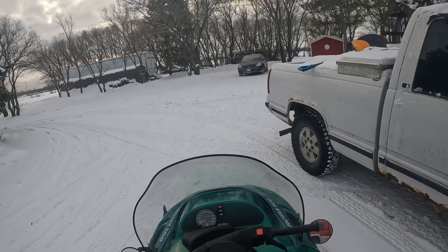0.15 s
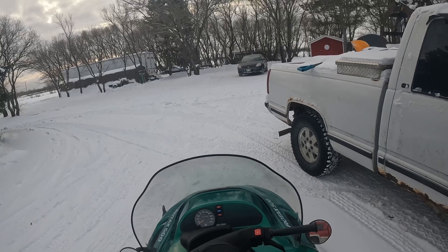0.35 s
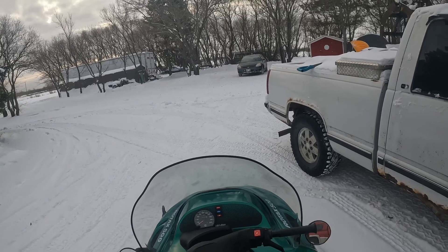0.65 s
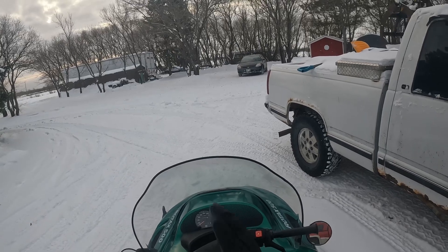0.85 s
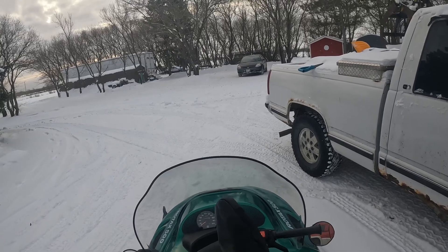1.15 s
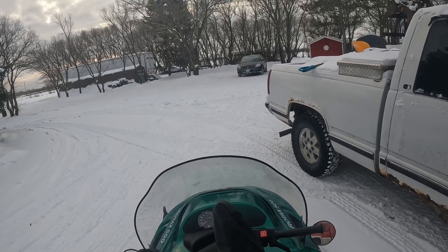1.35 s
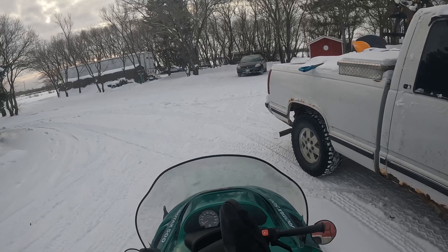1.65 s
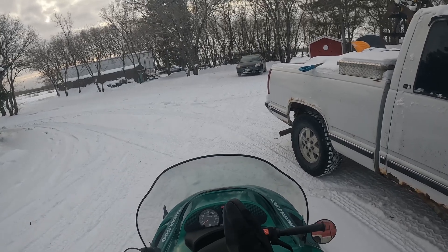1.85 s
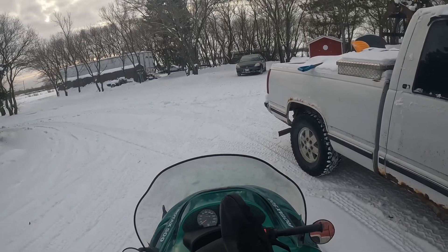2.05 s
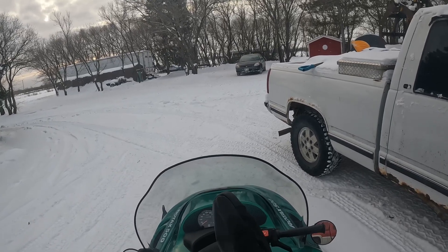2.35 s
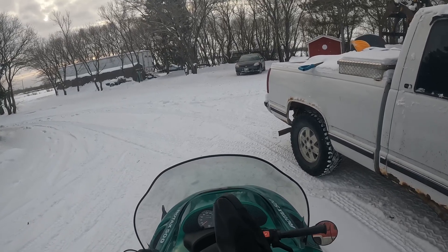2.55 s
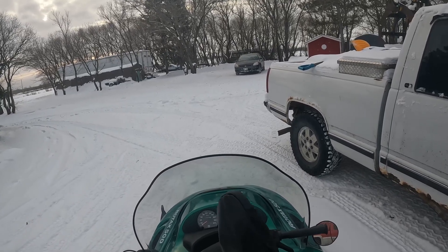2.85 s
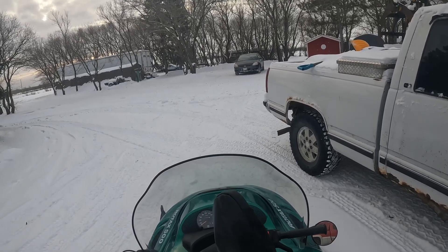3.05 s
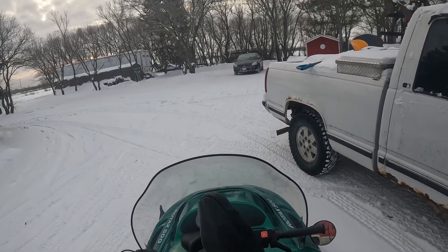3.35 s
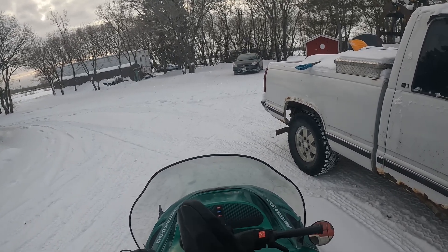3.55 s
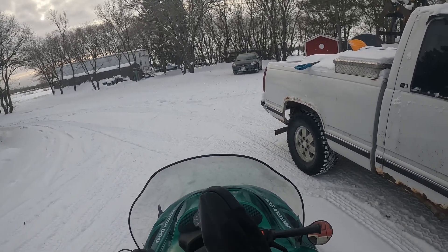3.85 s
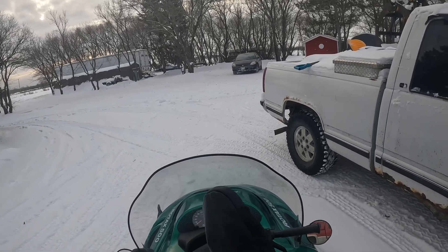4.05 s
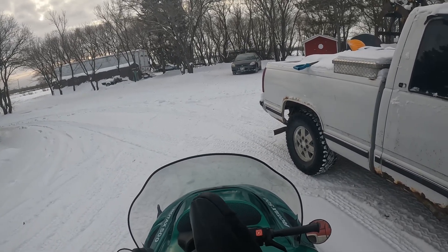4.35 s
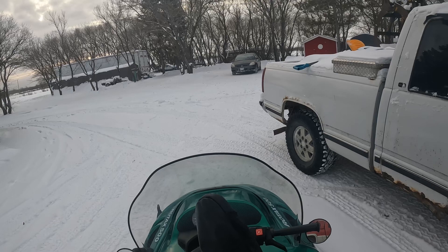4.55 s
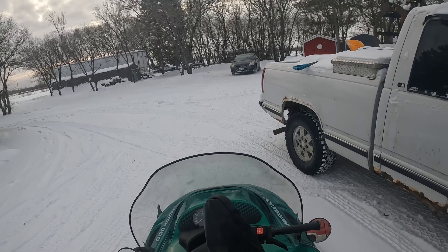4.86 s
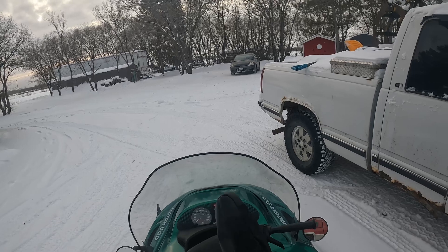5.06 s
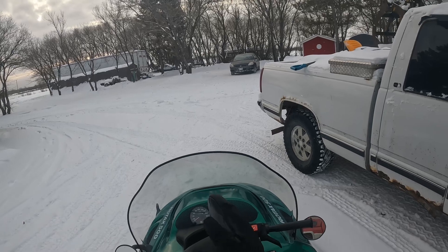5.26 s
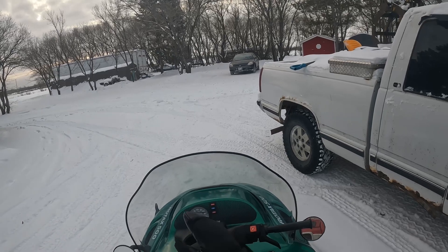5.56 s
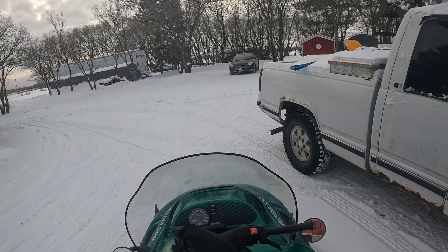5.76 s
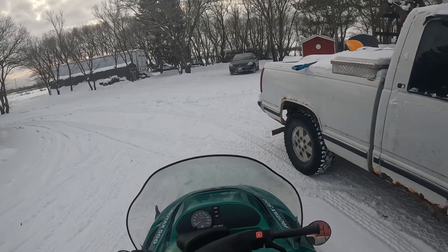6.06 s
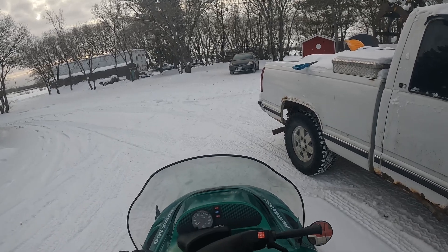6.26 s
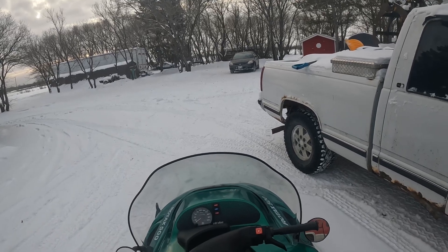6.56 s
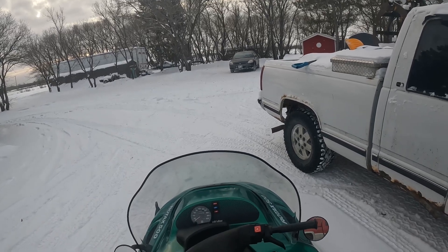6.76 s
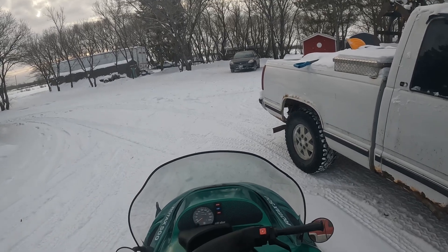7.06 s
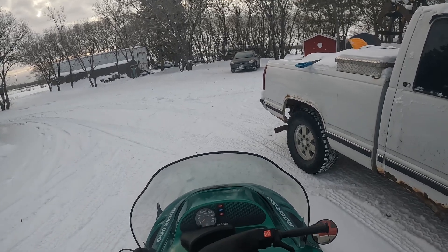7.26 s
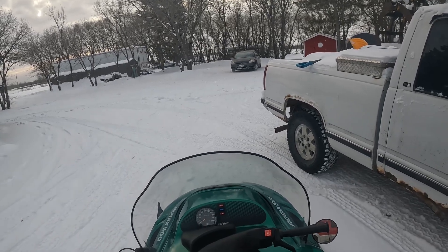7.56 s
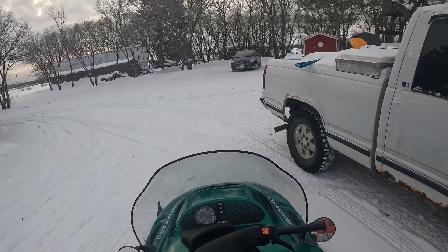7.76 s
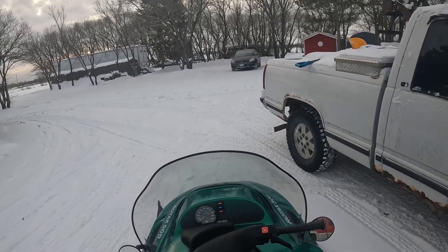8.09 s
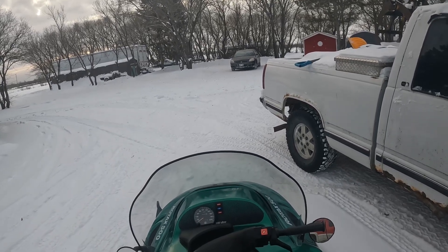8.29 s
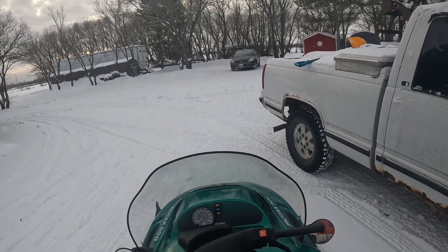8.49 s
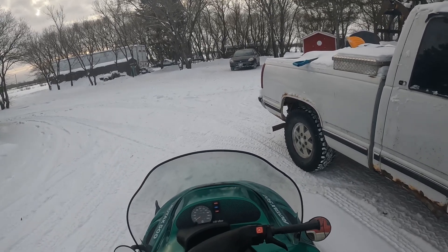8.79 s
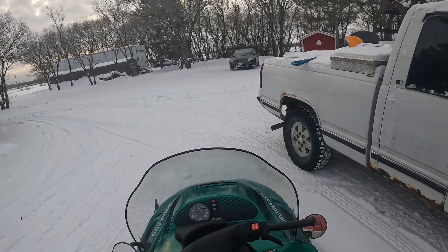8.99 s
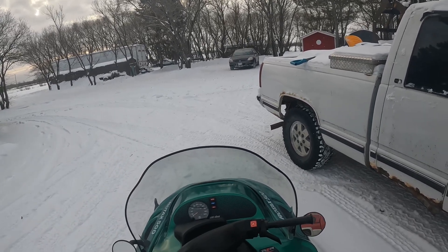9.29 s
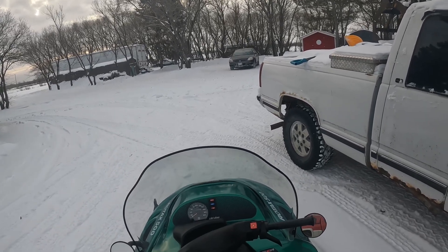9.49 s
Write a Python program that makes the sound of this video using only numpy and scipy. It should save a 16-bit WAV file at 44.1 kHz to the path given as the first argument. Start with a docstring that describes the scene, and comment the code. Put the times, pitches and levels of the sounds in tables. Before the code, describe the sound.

A two-stroke twin snowmobile idles just below the microphone in an open snowy yard. Its low burble is irregular, with soft puffs broken by harder, raspy firings every few strokes. Pistons and clutch clatter under the hood. A second muffled engine hums nearby, wavering slightly. A few loose parts knock, and air gently buffets the microphone. The idle continues throughout, dry and without echo.

```python
"""In an open, snowy yard, a two-stroke twin snowmobile idles just below the microphone.
It burbles: most strokes only puff, but every few strokes one fires hard and rasps through the steel pipe.
Pistons and clutch clatter under the hood, made of contact pulses that shake ringing noise.
A second engine hums nearby at a wandering speed, made of muffled tones and gas noise.
Loose parts knock now and then, and slow, deep noise is the air buffeting the microphone."""
import sys
import numpy as np
from scipy import signal
from scipy.fft import rfft, irfft
from scipy.io import wavfile
from scipy.ndimage import uniform_filter1d

SR = 44100
rng = np.random.default_rng(int(sys.argv[2]) if len(sys.argv) > 2 else 0)


def materialize(psi):
    """Save the field psi as 16-bit PCM at rate SR to the path in sys.argv[1].

    A 1-D psi becomes a single channel; in a 2-D psi each row is a channel.
    """
    bounded = np.clip(np.atleast_2d(psi).T, -1, 1)
    quanta = np.round(bounded * 32767).astype(np.int16)
    wavfile.write(sys.argv[1], SR, quanta)


N = 424683
TIME = np.arange(N) / SR
# frequency of each spectrum bin (Hz), kept at 1 or more so that its logarithm exists
BINS = np.maximum(np.arange(N // 2 + 1) * SR / N, 1)
EARS = np.array([[1], [-1]])  # left and right in opposite directions

STROKES_PER_S = 44.6  # nominal pace of the piston strokes

# loudness of the exhaust over time: start_s, level_db (relative)
EXHAUST_LEVEL = [(0.0, -25.5), (2.5, -27), (4.7, -26), (6.1, -26), (7.05, -28.5), (7.7, -27), (8.64, -26.5),
                 (9.63, -28.5)]
# the loudest firings, which bark out of the burble: start_s, strength_db
BARK_TIMES = [(0.033, -1), (0.237, -3), (0.395, -4.5), (0.753, -1), (0.863, -0.5), (1.133, -6.5),
              (1.203, -1.5), (1.491, -2.5), (1.717, -3.5), (2.191, -4), (2.256, -2), (2.28, -2.5),
              (2.503, -1), (2.866, -0.5), (3.184, -5), (3.703, -1.5), (3.724, -2), (3.861, -2.5),
              (4.172, -3), (4.439, -4), (4.508, -4), (4.62, 0), (4.73, -2.5), (5.048, -2.5), (5.161, -4),
              (5.275, -3), (5.97, 2.5), (6.106, 2.5), (6.46, 2.5), (7.172, -1), (7.438, -3), (7.551, -5),
              (7.748, 0.5), (7.991, -3.5), (8.104, -3), (8.235, 2), (8.412, -1.5), (8.679, -2.5),
              (8.903, 2), (9.257, -4), (9.349, -0.5), (9.572, -3.5)]


def from_db(db):
    """Turn decibels into a gain."""
    return 10 ** (np.asarray(db) / 20)


def rms_one(x):
    """Scale a signal to an average power of 1."""
    return x / np.sqrt(np.mean(x ** 2) + 1e-20)


def in_time(rows):
    """Draw straight lines through (time, value) rows, giving a value for every sample."""
    times, values = np.transpose(rows)
    return np.interp(TIME, times, values)


def over_hz(points):
    """Draw lines through (Hz, dB) points on a logarithmic pitch scale, one value per bin."""
    hz, db = np.transpose(points)
    return np.interp(np.log(BINS), np.log(hz), db)


def drift(rate_hz):
    """Make a slow random wander with a typical size of 1; a higher rate wanders faster."""
    spectrum = rfft(rng.standard_normal(N))
    return rms_one(irfft(spectrum / (1 + (BINS / rate_hz) ** 2), N))


def clicks(times, sizes):
    """Place single-sample clicks at the given times in seconds."""
    out = np.zeros(N)
    places = np.clip(np.round(times * SR).astype(int), 0, N - 1)
    out[places] = sizes
    return out


def bumps(rows, half_s):
    """Make a smooth, bell-shaped rise and fall of gain around each (time, dB) event."""
    return sum(from_db(db) * np.exp(-.5 * ((TIME - s) / half_s) ** 2) for s, db in rows)


def ring(x, hz, width_hz):
    """Resonate: a click of 1 leaves a sine about 1 high, dying faster the wider the resonance."""
    decay = np.exp(-np.pi * width_hz / SR)
    angle = 2 * np.pi * hz / SR
    # the tiny offset keeps the filter away from very slow, near-zero arithmetic
    return signal.lfilter([0, np.sin(angle)], [1, -2 * decay * np.cos(angle), decay * decay], x + 1e-18)


def swell(x, rise_s, fall_s):
    """Turn each click into a quick, rounded rise and a fading tail."""
    up, down = np.exp(-1 / (rise_s * SR)), np.exp(-1 / (fall_s * SR))
    tails = signal.lfilter([1], [1, -down], x + 1e-18)
    return signal.lfilter([(1 - up) ** 2], [1, -2 * up, up * up], tails)


def resonant_noise(colour, rings=()):
    """Make stereo noise with a broad colour; narrow resonances stand out of it."""
    # spread between the ears: pitch_hz, side_over_mid_db
    ear_width = [(60, -23), (180, -49), (310, -16.5), (540, -13), (1000, -13), (1650, -0.5), (2300, -8),
                 (3000, -3.5), (4200, -4), (5200, -76.5), (8500, -12.5)]
    # balance of the ears: pitch_hz, left_over_right_db
    ear_lean = [(180, 0.5), (540, 1), (940, 4.5), (1640, 1.5), (2840, -1.5), (4930, -0.7), (8500, 0.3)]
    gain = from_db(over_hz(colour))
    for hz, width_hz, lift_db in rings:
        extra_power = from_db(lift_db) ** 2 - 1
        gain = gain * np.sqrt(1 + extra_power / (1 + (2 * (BINS - hz) / width_hz) ** 2))
    mid, side = rfft(rng.standard_normal((2, N)))
    pair = mid + EARS * side * from_db(over_hz(ear_width))
    pair = pair * from_db(EARS * over_hz(ear_lean) / 2)
    return rms_one(irfft(pair * gain, N))


def stroke_count():
    """Count piston strokes over time, letting about a whole number pass between barks."""
    times = np.array(BARK_TIMES)[:, 0]
    counts = np.append(0, np.cumsum(np.round(np.diff(times) * STROKES_PER_S)))
    # how far the engine runs ahead of the nominal pace, smoothed so that its speed never jumps
    lead = np.interp(TIME, times, counts - times * STROKES_PER_S)
    return TIME * STROKES_PER_S + uniform_filter1d(lead, size=8000)


def firings(strokes, lull_s=.055):
    """Click for each hard firing: the set barks, and strokes that catch by chance between them."""
    # the chance grows as fresh charge builds up: strokes_since_firing, chance (0-1)
    catch_chance = [(1, .24), (2, .14), (3, .5), (6, 1)]
    bark_s, bark_db = np.transpose(BARK_TIMES)
    exhaust_db = np.interp(strokes, *np.transpose(EXHAUST_LEVEL))
    luck, size = rng.random((len(strokes), 2)).T
    # ordinary firings follow the exhaust level around -9.5 dB, with a random spread of 3.5 dB
    strength_db = -9.5 + exhaust_db - exhaust_db.mean() + 3.5 * np.sqrt(3) * (2 * size - 1)
    caught = np.zeros(len(strokes))
    waited = 0
    half_stroke_s = .5 / STROKES_PER_S
    for k, s in enumerate(strokes):
        ahead_s = bark_s - s
        barks = np.any(np.abs(ahead_s) < half_stroke_s)
        # no chance firing comes in the short lull before a bark
        lull = np.any((ahead_s > -half_stroke_s) & (ahead_s < lull_s))
        caught[k] = not lull and luck[k] < np.interp(waited, *np.transpose(catch_chance))
        waited = 1 if barks or caught[k] else waited + 1
    return clicks(bark_s, from_db(bark_db)) + clicks(strokes, caught * from_db(strength_db))


def exhaust(count, strokes, hard, uneven=0.074, puff_db=-2, thump_db=9):
    """Sound a steady note locked to the crank, and uneven puffs that thump the silencer."""
    # tones of the note: multiple_of_crank_speed, level_db
    crank_tones = [(1, -8.5), (2, -4.5), (3, -8.5), (4, -1), (5, -10), (6, -9.5)]
    # silencer resonances: pitch_hz, width_hz, level_db
    silencer = [(57.2, 9.8, -2.5), (91.8, 8.2, -3.5), (129.6, 21, 0.5), (218.2, 13.8, -14.5)]
    note = 0
    for order, db in crank_tones:
        wobble = 1 + uneven * drift(15.0)
        # a twin makes two strokes per turn of the crank, so one stroke is half a turn
        tone = np.sin(np.pi * order * count + rng.uniform(0, 2 * np.pi))
        note = note + from_db(db) * wobble * tone
    puffs = clicks(strokes, from_db(puff_db) * rng.standard_normal(len(strokes)))
    puffs = puffs + from_db(thump_db) * hard
    thumps = 0
    for k, (hz, width_hz, db) in enumerate(silencer):
        thumps = thumps + from_db(db) * ring(puffs, hz, width_hz) * (-1) ** k
    # the small outlet radiates no deep bass, and a chamber swallows a band around 156.7 Hz
    thumps = signal.sosfilt(signal.butter(2, [20, 260], "band", fs=SR, output="sos"), thumps)
    thumps = signal.lfilter(*signal.iirnotch(156.7, 4, fs=SR), thumps)
    return from_db(in_time(EXHAUST_LEVEL)) * (np.sqrt(2) * note + thumps)


def rasp(strokes, hard, vary_db=2.44, weak_db=-21, weak_spread_db=5.3, flicker_db=0.97):
    """Blast gas noise through the steel pipe, each firing with its own colour; weak strokes sizzle."""
    # colour of the gas noise: pitch_hz, level_db (relative, per Hz)
    gas_colour = [(300, 6.5), (600, 0), (1000, 7), (1700, 1.5), (2400, 3), (3200, -0.5), (3650, -17),
                  (4100, -6.5), (4800, -0.5), (5500, -11), (6700, -1.5), (7850, 0), (8150, -11),
                  (10700, -27.5), (11900, -27), (13500, -35)]
    # ringing of the pipe's steel shell: pitch_hz, width_hz, lift_db
    pipe_rings = [(447, 33, 8.5), (1671, 8, 18.5), (2034, 35, 10), (3050, 25, 11), (3310, 29, 9.5),
                  (4070, 38, 9), (4360, 5.5, 10), (4754, 62, 4), (5960, 20, 11.5), (6030, 23, 11),
                  (6800, 60, 6.5), (7500, 44, 1.5), (7230, 46, 6.5), (7750, 76, 6)]
    # how a blast's power swells and dies, band by band: top_hz, rise_s, fall_s
    blast_bands = [(2400, 0.0047, 0.028), (3650, .005, 0.015), (5200, .0052, 0.017), (7260, 0.0038, 0.0093),
                   (8300, 0.0048, 0.0049), (14000, 0.0027, 0.014)]
    weak = clicks(strokes, from_db(weak_db + weak_spread_db * rng.standard_normal(len(strokes))))
    power = hard ** 2 + weak ** 2
    hiss = rfft(resonant_noise(gas_colour, pipe_rings))
    gas, low_hz = 0, 0
    for high_hz, rise_s, fall_s in blast_bands:
        # this band's random share of each blast
        share = from_db(vary_db * np.clip(rng.standard_normal(N), -2, 2))
        band = irfft(hiss * ((BINS >= low_hz) & (BINS < high_hz)), N)
        gas = gas + band * np.sqrt(swell(power * share ** 2, rise_s, fall_s))
        low_hz = high_hz
    gas = gas * from_db(flicker_db * drift(200))
    # a thin steel ring that the firings keep alive, opposite in the two ears
    shaking = np.sqrt(swell(power, rise_s=0.0097, fall_s=.02)) * rng.standard_normal(N)
    steel = rms_one(ring(shaking, hz=1661, width_hz=10))
    return from_db(-35.5) * gas + from_db(-51.5) * steel * EARS


def clatter(count, strokes, loose_per_s=130, grain_db=3):
    """Slap the pistons on each stroke and rattle the clutch between; one cylinder is louder."""
    # loudness over time: start_s, level_db (before a lift of 3 dB)
    clatter_level = [(0, -40), (1.7, -41), (4.7, -40.5), (5.6, -41.5), (6.45, -40.5), (6.85, -42.5),
                     (8.4, -40.5), (9.6, -40)]
    # colour of the clatter: pitch_hz, level_db (relative, per Hz)
    clatter_colour = [(200, -2), (320, -9.5), (600, -19.5), (900, -15.5), (1350, -12.5), (1620, -17.5),
                      (2300, -13), (2900, -23), (3600, -31.5), (4700, -35.5), (5500, -32), (7200, -26),
                      (8500, -41), (12000, -80)]
    # ringing of cases and hood: pitch_hz, width_hz, lift_db
    hood_rings = [(461.5, 28, 9.5), (744, 50, 8.5), (1009, 73, 19), (1286, 4.9, 1), (1492, 54, 13),
                  (1773, 15, 7), (1840, 12, -3.5), (2064, 8.3, 5.5), (3270, 17, 3)]
    slaps = clicks(strokes, from_db(-1.5 + grain_db * rng.standard_normal(len(strokes))))
    loose = rng.random(N) < loose_per_s / SR
    rattles = loose * from_db(grain_db * rng.standard_normal(N))
    contacts = rms_one(np.sqrt(swell(slaps ** 2 + rattles ** 2, rise_s=.0005, fall_s=0.006)))
    # 2.2 is a steady share of shaking; the cosine turns every other stroke up and the rest down by 1 dB
    shake = rms_one((contacts + 2.2) * from_db(1.0 * np.cos(np.pi * count)))
    return from_db(in_time(clatter_level) + 3) * shake * resonant_noise(clatter_colour, hood_rings)


def neighbour(waver_hz=0.25, surge_db=0.5, gas_db=-24):
    """Hum with a second engine's muffled tailpipe tones and gas flow; picking up speed swells it."""
    # wandering speed, before wavering and stumbles: start_s, firings_per_s
    engine_speed = [(0.0, 42.7), (0.2, 42.3), (0.45, 41.3), (1.0, 42.6), (1.45, 41.9), (1.85, 41.1),
                    (2.4, 42.0), (3.1, 43.5), (3.65, 41), (4.35, 42.1), (4.9, 40.7), (5.75, 41.4),
                    (7.0, 39.3), (7.55, 40.7), (7.8, 42.4), (8.35, 43.9), (8.7, 40.9), (9.63, 41.8)]
    # brief stumbles: middle_s, speed_loss (firings per s)
    stumbles = [(0.291, 2.1), (1.63, 1.55), (3.47, 1.02), (4.49, 1.54), (5.42, 1.728), (6.14, 1.83)]
    # its tones: multiple_of_firing_rate, level_db, unsteadiness (0-1)
    firing_tones = [(2, -17, 0.35), (3, -9.5, 0.3), (4, -1.5, 0.14), (5, -25.5, 0.9), (6, -22.5, 0.1),
                    (7, -25, 0.13), (8, -36.5, 0), (11, -29.5, 0)]
    # colour of the gas flow: pitch_hz, level_db (relative, per Hz)
    flow_colour = [(150, -7.5), (220, 2), (310, -4.5), (450, 1.5), (580, -13), (900, -9.5), (2000, -36.5),
                   (5000, -63)]
    surge = drift(6.3)
    rate = in_time(engine_speed) + waver_hz * surge
    for middle_s, loss in stumbles:
        rate = rate - loss * np.exp(-.5 * ((TIME - middle_s) / .05) ** 2)
    turn = 2 * np.pi * np.cumsum(rate) / SR
    tones = 0
    for order, db, shaky in firing_tones:
        # a complex wobble shakes both the strength and the phase
        wobble = 1 + shaky * (drift(28) + 1j * drift(16.0)) / np.sqrt(2)
        tones = tones + from_db(db) * wobble * np.exp(1j * (order * turn + rng.uniform(0, 2 * np.pi)))
    gas = from_db(gas_db) * resonant_noise(flow_colour) * (1 + .5 * np.cos(turn))
    # loudest at the speed that suits its pipe: 42.7 firings per s, with a width of 2.6
    in_tune = 1 / np.sqrt(1 + (2 * (rate - 42.7) / 2.6) ** 2)
    return from_db(-25.5 + surge_db * surge) * in_tune * (np.sqrt(2) * tones.real + gas)


def air(buffet_db=-28, swing_db=2.04, boom_hz=53):
    """Push lumpy air pressure onto the microphone, with gusts and one low boom that swells twice."""
    # colour of the buffeting: pitch_hz, level_db (relative, per Hz)
    buffet_colour = [(3, -11.5), (9, 12.5), (15, 5.5), (29, -4.5), (45, -6.5), (130, -17), (200, -24),
                     (400, -74.5)]
    # the stronger gusts: middle_s, level_db
    gusts = [(0.62, -18), (2.83, -20), (5.46, -25.5), (6.41, -15), (6.73, -20), (7.55, -20), (8.54, -20),
             (9.3, -20), (9.56, -17)]
    # swells of the boom: middle_s, level_db
    boom_swells = [(6.588, -14.5), (6.695, -15.5)]
    steady = from_db(buffet_db + swing_db * drift(3.3))
    buffet = np.hypot(steady, bumps(gusts, half_s=0.037))
    boom = np.sqrt(2) * np.sin(2 * np.pi * boom_hz * TIME + 0.24 * drift(23))
    return buffet * resonant_noise(buffet_colour) + bumps(boom_swells, half_s=0.028) * boom


def knocks(contact_s=.0013, chatter_share=0.17):
    """Strike the body with loose parts that chatter briefly; bright blows stir high modes, heavy ones low."""
    # the knocks: start_s, level_db (relative), brightness_db, weight_db
    knock_list = [(0.885, -25.5, -3, -9), (2.745, -31.5, -8, -3), (3.566, -34, 5, 5),
                  (3.626, -21.5, 2.5, 2.5), (3.942, -37, 2, -4), (4.324, -33, -11, -3),
                  (6.381, -34, -7, -1.5), (7.035, -33.5, -8, 0), (7.593, -20.5, -7, -15),
                  (8.258, -35, 2, -17), (9.169, -27.5, -5, -10)]
    # each knock is a touch and two quick bounces: after_s, level_db
    bounces = [(0, 2), (.002, -7), (.0068, -16)]
    # what they ring with: pitch_hz, width_hz, level_db
    body_modes = [(452, 28, -9), (720, 110, -6), (1100, 130, -3), (1357, 60, -4), (1850, 130, -5),
                  (2250, 220, -7), (2750, 170, -7), (4100, 300, -17), (5200, 400, -16), (6800, 700, -19)]
    blows = []
    for start_s, level_db, bright, weight in knock_list:
        for after_s, bounce_db in bounces:
            blows.append((start_s + after_s, level_db + bounce_db, bright, weight))
    times, blow_db, bright_db, weight_db = np.transpose(blows)
    out = 0
    for k, (hz, width_hz, mode_db) in enumerate(body_modes):
        octave = np.log2(hz / 1800)  # octaves above (or below) the middle
        tilt_db = bright_db * np.clip(octave, 0, 1) + weight_db * np.clip(-octave, 0, 1)
        blow = clicks(times, from_db(blow_db + tilt_db + mode_db))
        chatter = swell(blow, rise_s=0.00034, fall_s=contact_s) * rng.standard_normal((2, N))
        out = out + ring(blow * (-1) ** k + chatter_share * chatter, hz, width_hz)
    return out


def scene():
    """Add up all sources without echo, because the snow swallows it."""
    count = stroke_count()
    # a stroke falls wherever the count passes a whole number
    strokes = TIME[1:][np.diff(np.floor(count)) > 0]
    hard = firings(strokes)
    engine = exhaust(count, strokes, hard) + rasp(strokes, hard) + clatter(count, strokes)
    return engine + neighbour() + air() + knocks()


def record(dry):
    """Let steady pressure leak away below 4 Hz and cut the top steeply above about 13.5 kHz."""
    dry = signal.sosfilt(signal.butter(1, 4, "high", fs=SR, output="sos"), dry)
    # the cut reaches its full 70 dB at 14.5 kHz
    return signal.sosfilt(signal.cheby2(12, 70, 14500, fs=SR, output="sos"), dry)


dry = scene()
out = record(dry)
materialize(out)
```